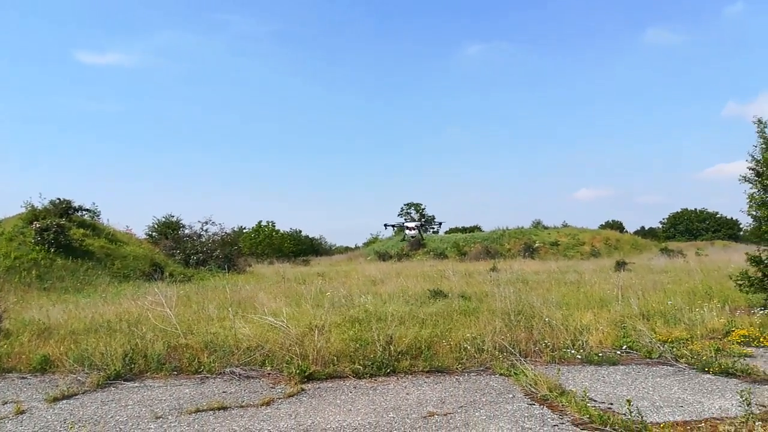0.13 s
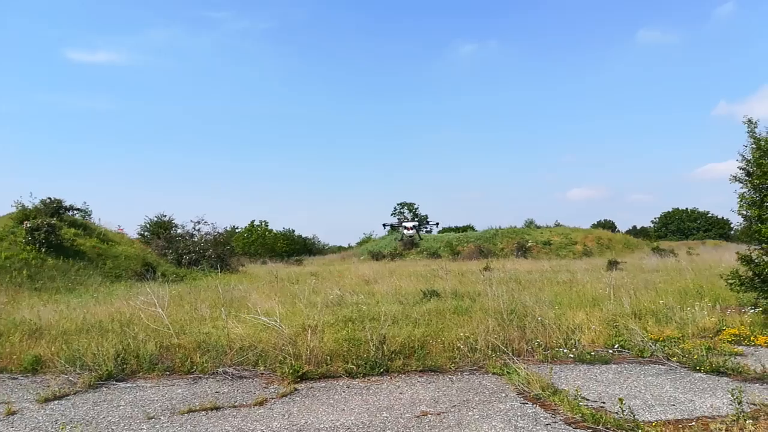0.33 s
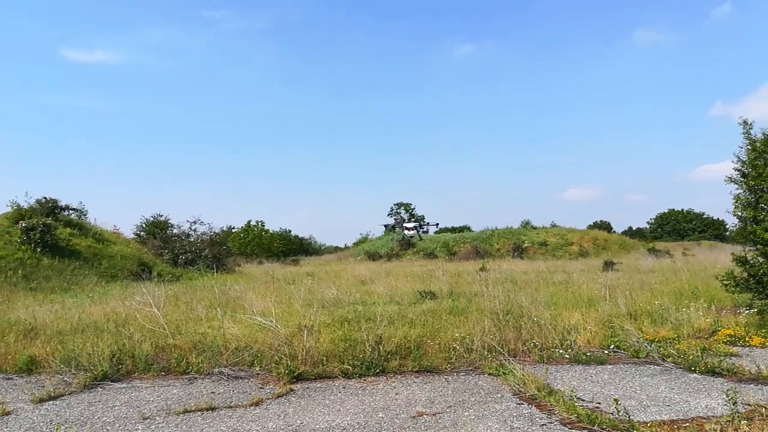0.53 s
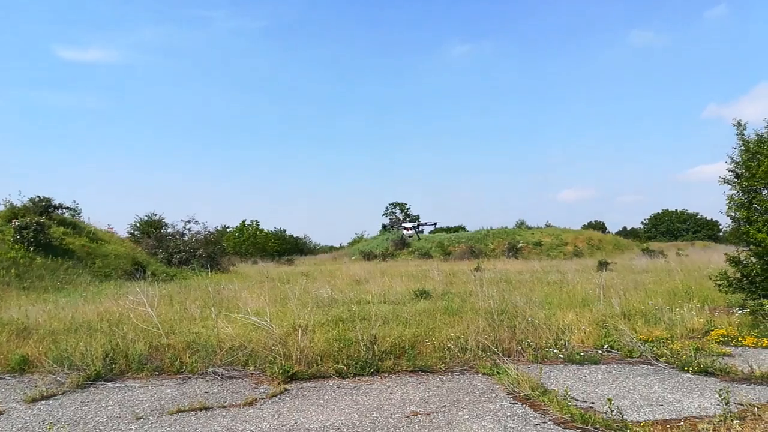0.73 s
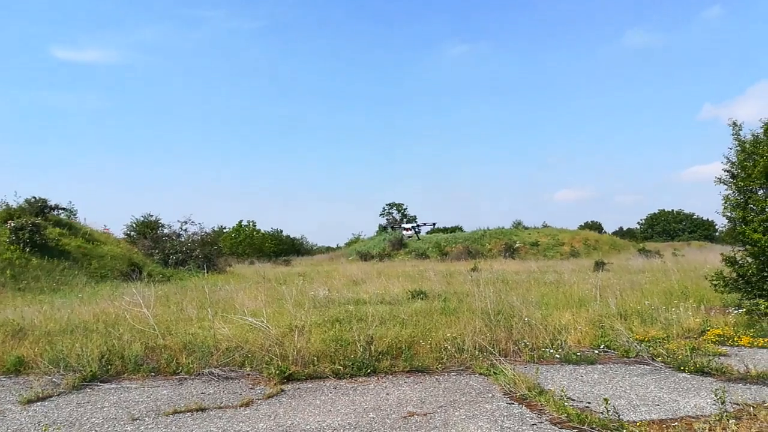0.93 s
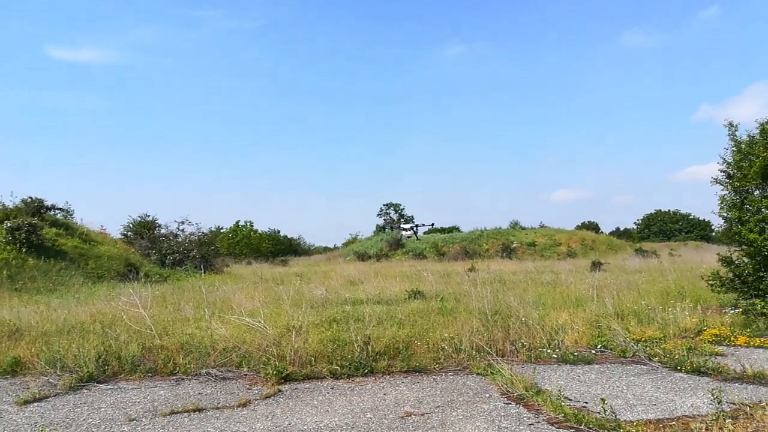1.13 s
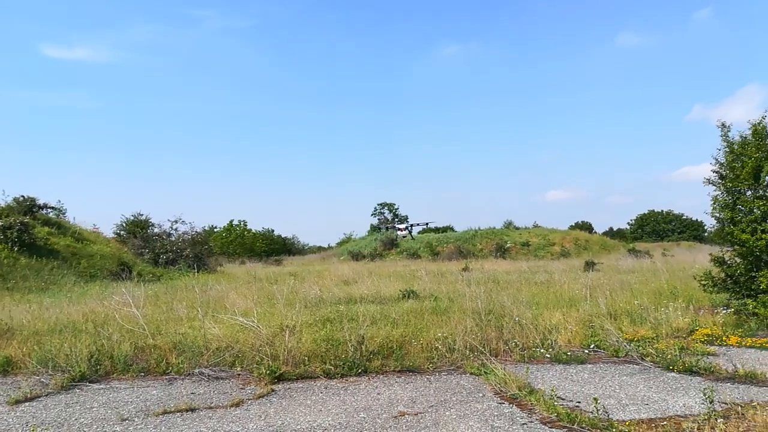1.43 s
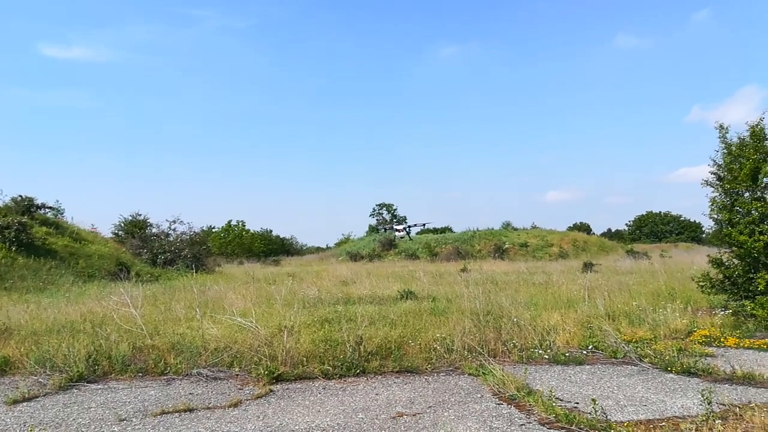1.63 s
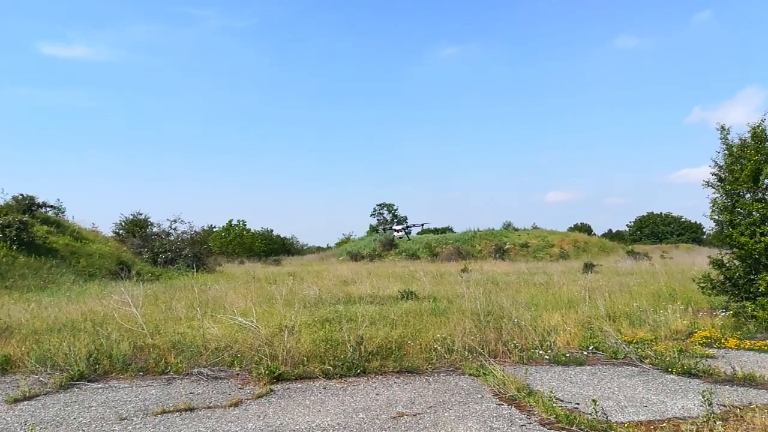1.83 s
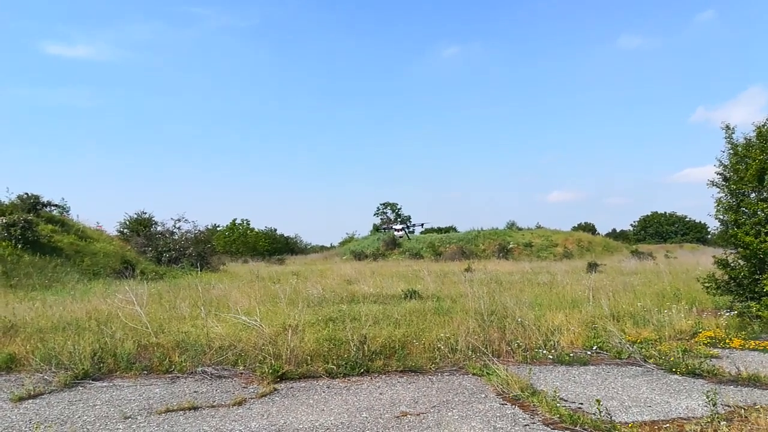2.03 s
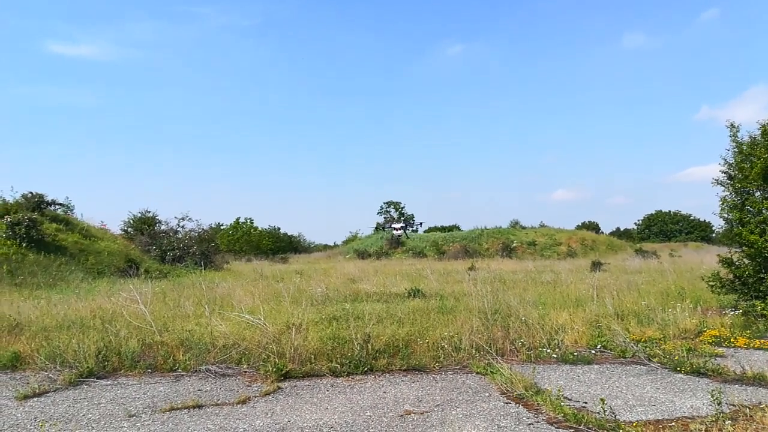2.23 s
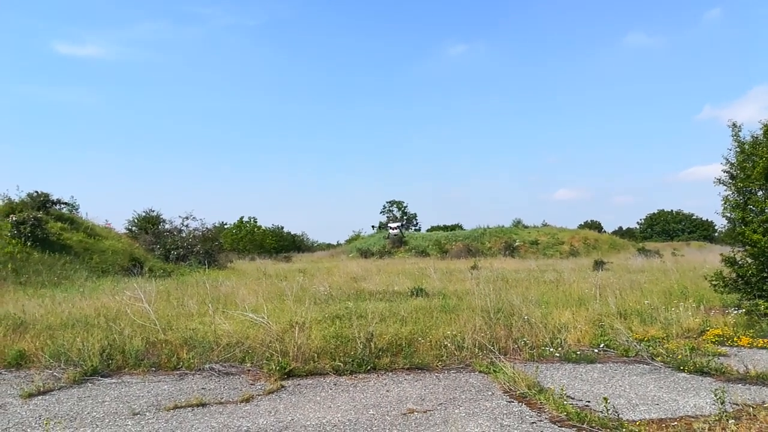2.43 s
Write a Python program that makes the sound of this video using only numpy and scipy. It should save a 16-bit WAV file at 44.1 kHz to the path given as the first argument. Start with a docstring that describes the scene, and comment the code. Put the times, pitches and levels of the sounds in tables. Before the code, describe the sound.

A large multi-rotor drone hovers steadily some way off over an open field, shrill wavering motor whines above a low beating hum and choppy air rush; faint bird chirps come midway, in quiet outdoor stereo.

```python
"""Over an open field a large six-rotor drone hovers low, some way off.
Each rotor turns at its own wavering speed: the blade tones beat, and the blades chop the air into a rush.
Each motor whines at a high multiple of its blade rate; noise rings in two narrow bands above 6 kHz.
A bird chirps faintly from the bushes as short gliding tones, some buzzy, with a scattered echo.
A brief rustle and a soft low bump are swells of band-limited noise."""
import sys
import numpy as np
from scipy import signal
from scipy.fft import rfft, irfft, next_fast_len
from scipy.io import wavfile
from scipy.ndimage import map_coordinates

SR = 44100
rng = np.random.default_rng(int(sys.argv[2]) if len(sys.argv) > 2 else 0)


def unload_audio(sound):
    """Save the sound as a 16-bit wav file, at the path given as the first command line argument."""
    columns = np.transpose(np.atleast_2d(sound))
    # keep every value between -1 and 1, then stretch to whole-number steps
    steps = np.round(np.clip(columns, -1, 1) * 32767)
    wavfile.write(sys.argv[1], SR, steps.astype(np.int16))


N = 114219  # samples

# Motors heard by their lower whine: (time [s], whine frequency [Hz], level [dB])
LOW_A = [(0, 3916, -48.5), (.17, 3794, -52.5), (.48, 3741, -60), (.66, 3845, -62), (1.0, 3760, -54),
         (1.19, 3716, -54.5), (1.38, 3814, -55.5), (1.82, 3867, -57), (2.0, 3830, -56), (2.28, 3865, -57.5),
         (2.36, 3914, -56), (2.45, 3862, -56.5), (2.59, 3886, -52.5)]
LOW_B = [(0, 4218, -60), (.38, 4273, -63), (.9, 4260, -63.5), (1.15, 4194, -64), (1.65, 4134, -73),
         (1.85, 4220, -66), (2.2, 4128, -73), (2.59, 4160, -70)]
LOW_C = [(0, 3873, -52), (.25, 3932, -68), (.65, 3974, -87), (1.22, 3935, -78), (1.34, 4017, -66),
         (1.45, 3988, -67), (1.76, 3995, -56), (1.93, 4020, -74), (2.59, 3985, -70)]
# Motors heard by their upper whine: (time [s], whine frequency [Hz], level [dB])
HIGH_A = [(0, 6155, -63), (.2, 6218, -50), (.45, 6224, -49), (.56, 6170, -68), (.88, 6204, -49.5),
          (1.36, 6097, -59), (1.52, 6008, -64), (1.64, 6120, -53.5), (1.73, 6186, -41), (1.81, 6080, -72),
          (1.89, 6194, -47), (1.97, 6210, -39), (2.07, 6162, -56), (2.3, 6172, -44), (2.38, 6088, -63),
          (2.49, 6216, -39.5), (2.59, 6263, -51.5)]
HIGH_B = [(0, 6573, -43), (.12, 6610, -41), (.2, 6580, -50), (.28, 6584, -44), (.37, 6420, -45),
          (.49, 6605, -38.5), (.58, 6557, -41.5), (.71, 6537, -40), (.8, 6610, -44.5), (.88, 6540, -41),
          (1.0, 6683, -53), (1.22, 6770, -51), (1.36, 6760, -68), (1.88, 6915, -70), (2.38, 6924, -64),
          (2.59, 6800, -61)]
HIGH_C = [(0, 6390, -70), (.25, 6435, -56), (.58, 6352, -68), (.9, 6293, -58), (1.02, 6274, -42.5),
          (1.12, 6225, -40), (1.165, 6170, -43), (1.22, 6198, -35.5), (1.27, 6228, -41), (1.34, 6350, -55),
          (2.59, 6443, -83)]
LOW_ORDER, HIGH_ORDER = 42, 63  # whine cycles per blade pass
# Rotors: (motor curve, whine order [cycles per pass], slap gain [dB], whine left minus right [dB])
ROTORS = [(LOW_A, LOW_ORDER, -8, 0.89), (LOW_B, LOW_ORDER, -8, -14.5), (LOW_C, LOW_ORDER, 0, -0.8),
          (HIGH_A, HIGH_ORDER, -6.5, -7), (HIGH_B, HIGH_ORDER, -12, -3), (HIGH_C, HIGH_ORDER, -11, -3.18)]
# Spectrum of the blade slap: (frequency [Hz], level before slap gain and swell [dB])
BLADE_SPECTRUM = [(190, -61), (285, -69.5), (440, -80), (570, -68), (770, -67), (1150, -78), (1900, -75.5)]
# Slow swell of the rush and the blade overtones: (time [s], gain [dB])
AIR_SWELL = [(0, 4.5), (.4, 3), (.7, 1), (1.1, -0.5), (1.55, -1.5), (2.2, -0.97), (2.59, -3)]
# Times when the two nearest rotors are in antiphase and their blade tones cancel: (time [s])
THROB_DIPS = [-.07, .05, .195, .31, .46, .62, .74, .83, .94, 1.16, 1.3, 1.42, 1.54, 1.67, 1.81, 1.97, 2.32,
              2.6]
# Spectral shape of the rush: (frequency [Hz], left relative level [dB], right relative level [dB])
RUSH_SPECTRUM = [(25.6, -90, -79), (59.6, -80.5, -80.5), (147, -83.5, -87), (243, -84, -83),
                 (355, -82, -86), (444, -103.5, -90.5), (622, -81, -80), (910, -82.5, -87),
                 (1070, -90.5, -90.5), (1625, -91, -90), (2020, -81.5, -82), (2170, -83.5, -99.5),
                 (2628, -78, -83), (2860, -91.5, -88), (3135, -77.5, -92), (3560, -90.5, -83),
                 (3860, -81.5, -79.5), (5130, -90, -86.5), (5800, -99, -90.5), (7130, -84.5, -82.5),
                 (7710, -94.5, -89.5), (8770, -103, -91.5), (10470, -105, -102), (14900, -106, -100),
                 (15600, -103, -95.5)]
# Part of the rush chopped by the blades: (frequency [Hz], amplitude share [0-1])
CHOPPED_SHARE = [(200, 0.48), (650, 0.49), (1400, 0.83), (2600, 0.67), (12000, 0.28)]
# Likeness of noise at the two ears: (frequency [Hz], correlation [-1 to 1])
EAR_LIKENESS = [(30, 0.37), (80, 0.91), (700, 0.96), (1300, 0.51), (2400, 0.52), (4400, 0), (15000, 0.023)]
# Ringing bands of the motors: (centre [Hz], width [Hz], left relative level [dB], right relative level [dB])
RING_BANDS = [(6209, 150, -7, 6.5), (6562, 240, -1, 3.5)]
# Course of the ringing: (time [s], level before a 3 dB cut [dB])
RING_LEVEL = [(0, -39.5), (.7, -41), (1.25, -43), (1.36, -45), (1.6, -48), (1.95, -41.5), (2.15, -45.5),
              (2.38, -42), (2.5, -41.5)]
# Bird chirps: (start [s], length [s], start pitch [Hz], end pitch [Hz], level [dB],
# left minus right [dB], buzz [0-1])
CHIRPS = [(.665, .125, 3370, 3030, -59, 14, .25), (.937, .03, 2870, 2590, -53.5, 18, 0),
          (1.015, .063, 4600, 4950, -55.5, 7, 1), (1.079, .007, 4500, 5400, -50, 7, 0),
          (1.11, .072, 2870, 2790, -54.5, 18, .15), (1.253, .065, 5550, 4950, -57.5, 0, .2),
          (1.32, .1, 4950, 4500, -60.5, 1, .7), (1.432, .008, 4450, 4750, -50, 4, 0)]
# Brief rustle: (centre time [s], half length [s], centre [Hz], half width [octaves], level [dB])
RUSTLE = (1.08, .07, 8000, 1.2, -60)
# Soft low bump: (centre time [s], half length [s], centre [Hz], half width [octaves], level [dB])
BUMP = (.022, .024, 60, .6, -47)

SLAP_SMEAR = 0.79  # scatter of the overtones' phases [rad]
SPEED_JITTER, JITTER_RATE = 0.001, 70  # scale [share of speed], random knots [1/s]
FLUTTER_DB, FLUTTER_RATE = 1.76, 22  # moving air flutters the whine: scale [dB], random knots [1/s]
LOAD_DEPTH = 0.19  # depth of the whine's pulse, once a turn
THROB_DB, PARTNER_DB = -53.5, -2.5  # nearest rotor [dB], its partner relative to it [dB]
THROB_WAVER_DB, THROB_WAVER_RATE = 1.5, 7.33  # uneven air path: scale [dB], random knots [1/s]
RUSH_DB = -47  # level before the swell [dB]
CHOP_SHARP = 4  # peakedness of a blade pass
BUZZ_RATE, BUZZ_SWEEP_HZ = 185, 400  # nominal pulses [1/s], sweep each way at full buzz [Hz]
QUAVER_HZ = 65  # scale of the random pitch unsteadiness [Hz]
ECHO_T60, ECHO_DB = .14, -13  # the bushes scatter the song: decay by 60 dB [s], level [dB]
TOP_HZ = 15800  # upper band limit [Hz]

TIME = np.arange(N) / SR  # [s]


def amp(db):
    """Amplitude ratio is ten to the power of decibels over twenty."""
    return 10 ** (np.asarray(db) / 20)


def unit(x):
    """Division by the root-mean-square value gives a signal of unit power."""
    return x / np.sqrt(np.mean(x ** 2) + 1e-20)


def along(points, hz):
    """Spectral columns are interpolated on a logarithmic frequency axis."""
    f, *columns = np.transpose(points)
    return np.array([np.interp(np.log(hz + 1), np.log(f + 1), c) for c in columns])


def curves(rows):
    """Columns after the time are interpolated linearly, one value per sample."""
    s, *columns = np.transpose(rows)
    return [np.interp(TIME, s, c) for c in columns]


def wobble(rate):
    """A smooth random fluctuation is a spline through random knots, rate of them a second."""
    knots = rng.standard_normal(4096)
    return map_coordinates(knots, [TIME * rate], mode="wrap")


def filtered(x, response):
    """Linear filtering is multiplication of the spectrum by a frequency response."""
    m = next_fast_len(N + SR // 4)  # padded length
    hz = np.fft.rfftfreq(m, 1 / SR)
    return irfft(rfft(x, m) * response(hz), m)[..., :N]


def stereo_noise():
    """The power ratio of mid to side noise sets the correlation between the ears at each frequency."""
    def mid_side_gains(hz):
        angle = np.arccos(np.clip(along(EAR_LIKENESS, hz)[0], -1, 1)) / 2
        return np.array([np.cos(angle), np.sin(angle)])

    mid, side = filtered(rng.standard_normal((2, N)), mid_side_gains)
    return np.array([mid + side, mid - side])


def rotor(motor, order, slap_db, pan_db):
    """Periodic blade passes radiate harmonics; the motor whines at a fixed multiple of the pass rate."""
    whine_hz, level_db = curves(motor)
    pass_hz = whine_hz / order * (1 + SPEED_JITTER * wobble(JITTER_RATE))
    phase = 2 * np.pi * (np.cumsum(pass_hz) / SR + rng.random())

    slap = 0
    for k in range(2, 20):  # overtones of the blade-pass tone
        overtone_db = slap_db + along(BLADE_SPECTRUM, k * pass_hz.mean())[0]
        slap = slap + amp(overtone_db) * np.sin(k * phase + SLAP_SMEAR * rng.standard_normal())
    hum = amp(curves(AIR_SWELL)[0]) * slap

    ears = []
    for side in (1, -1):  # left, right; each flutters on its own
        gain = amp(level_db + side * pan_db / 2 + FLUTTER_DB * wobble(FLUTTER_RATE))
        ears.append(gain * np.sin(order * phase + wobble(FLUTTER_RATE) / 2))
    load = 1 + LOAD_DEPTH * np.sin(phase / 2)  # two passes make a turn
    return np.sqrt(2) * (hum + np.array(ears) * load), phase


def throb(phase):
    """Interference: a partner slipping back one blade pass from dip to dip cancels part of the tone."""
    slip = 2 * np.pi * np.interp(TIME, THROB_DIPS, np.arange(len(THROB_DIPS)))
    level = amp(THROB_DB + THROB_WAVER_DB * wobble(THROB_WAVER_RATE))
    return np.sqrt(2) * level * (np.sin(phase) - amp(PARTNER_DB) * np.sin(phase - slip))


def rush(phases):
    """Turbulence is broadband noise, amplitude-modulated in part by each blade pass."""
    passes = 0
    for (_, _, slap_db, _), phase in zip(ROTORS, phases):
        pulse = np.exp(CHOP_SHARP * (np.cos(phase) - 1))
        passes = passes + amp(slap_db) * pulse * stereo_noise()

    def share(hz):
        return np.clip(along(CHOPPED_SHARE, hz)[0], 0, 1)

    chopped = filtered(unit(passes), share)
    steady = filtered(stereo_noise(), lambda hz: np.sqrt(1 - share(hz) ** 2))  # the remaining power
    air = filtered(chopped + steady, lambda hz: amp(along(RUSH_SPECTRUM, hz)))
    return amp(RUSH_DB + curves(AIR_SWELL)[0]) * unit(air)


def ringing(flicker_db=0.1, rate=25):
    """Resonance: the motors ring in narrow noise bands around their upper whine."""
    def bands(hz):
        response = 0
        for centre, width, left_db, right_db in RING_BANDS:
            peak = 1 / (1 + (2 * (hz - centre) / width) ** 2) ** 1.1
            response = response + amp([[left_db], [right_db]]) * peak
        return response

    noise = unit(filtered(rng.standard_normal((2, N)), bands))
    return amp(curves(RING_LEVEL)[0] - 3 + flicker_db * wobble(rate)) * noise


def bird():
    """Gliding tones, mostly from the left; buzz modulates both amplitude and frequency in rapid pulses."""
    song = np.zeros((2, N))
    for start, length, from_hz, to_hz, db, pan_db, buzz in CHIRPS:
        u = np.clip((TIME - start) / length, 0, 1)  # progress through the chirp
        beat = 2 * np.pi * BUZZ_RATE * (TIME - start) + wobble(BUZZ_RATE / 2) / 2
        glide = from_hz + (to_hz - from_hz) * u
        hz = glide + buzz * BUZZ_SWEEP_HZ * np.sin(beat) + QUAVER_HZ * wobble(BUZZ_RATE)
        swell = np.sqrt(4 * u * (1 - u)) * (1 + buzz * np.cos(beat))
        tone = np.sqrt(2) * swell * np.sin(2 * np.pi * np.cumsum(hz) / SR)
        song += amp([[db + pan_db / 2], [db - pan_db / 2]]) * tone

    # Scattering: convolution with exponentially decaying noise
    tail = rng.standard_normal((2, SR // 2)) * amp(-60 * TIME[:SR // 2] / ECHO_T60)
    echo = signal.fftconvolve(song, tail / np.linalg.norm(tail[0]), axes=1)[:, :N]
    return song + amp(ECHO_DB) * echo


def puff(at_s, half_s, centre_hz, octaves, db):
    """A noise burst is Gaussian in time and in log frequency, its half widths taken to 1/e."""
    def band(hz):
        return np.exp(-(np.log2((hz + 1) / centre_hz) / octaves) ** 2)

    swell = np.exp(-((TIME - at_s) / half_s) ** 2)
    return amp(db) * swell * unit(filtered(stereo_noise(), band))


def scene():
    """Superposition: the pressures of the drone, the bird, the rustle and the bump add."""
    tones, phases = zip(*[rotor(*row) for row in ROTORS])
    nearest = phases[3]
    drone = sum(tones) + throb(nearest) + rush(phases) + ringing()
    return drone + bird() + puff(*RUSTLE) + puff(*BUMP)


def record(dry):
    """An ideal low-pass filter removes everything from the band limit upward."""
    return filtered(dry, lambda hz: hz < TOP_HZ)


dry = scene()
out = record(dry)
unload_audio(out)
```